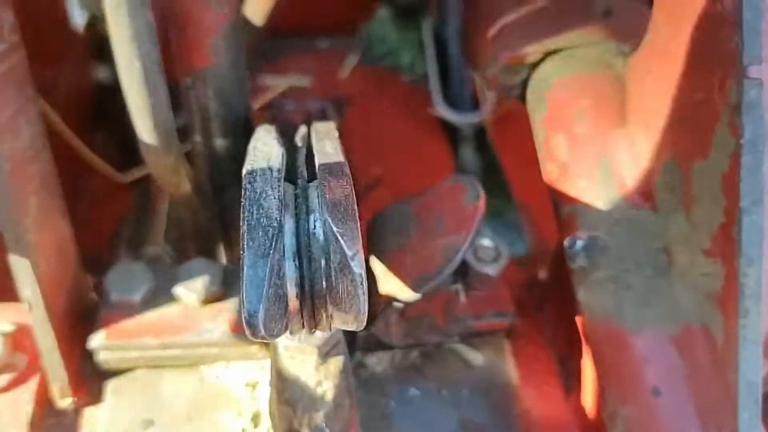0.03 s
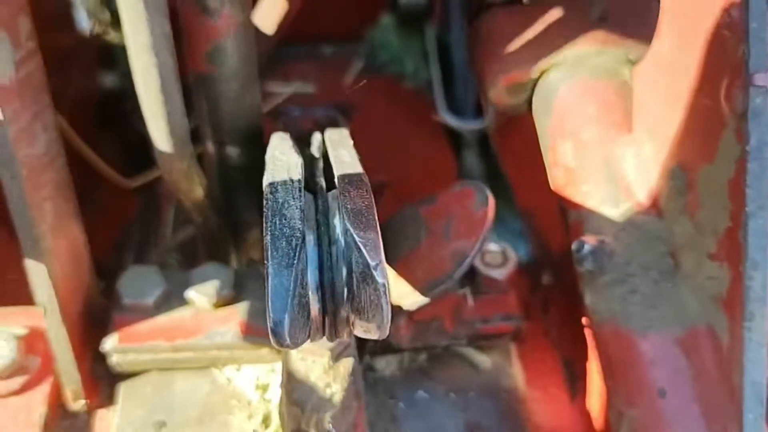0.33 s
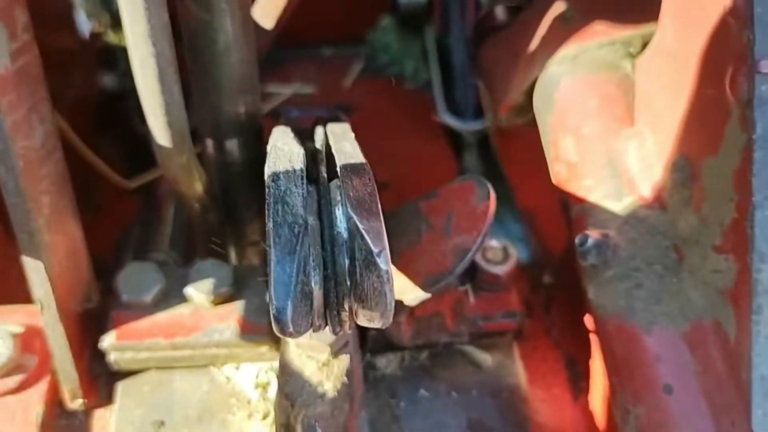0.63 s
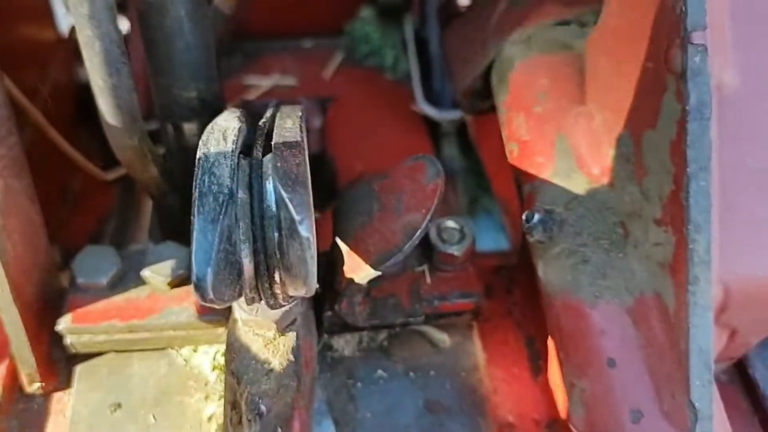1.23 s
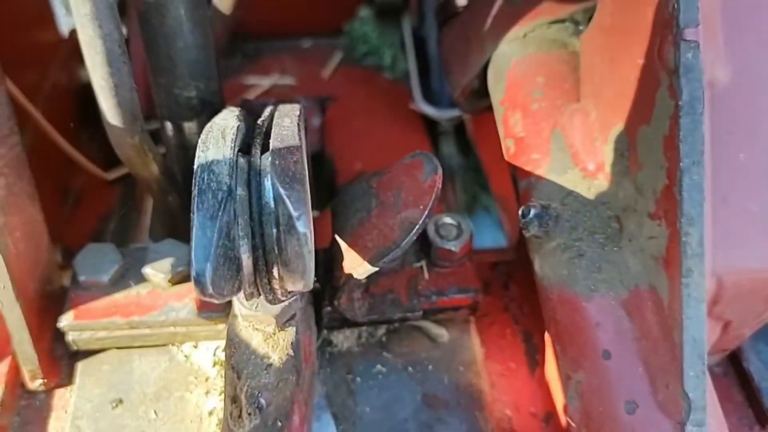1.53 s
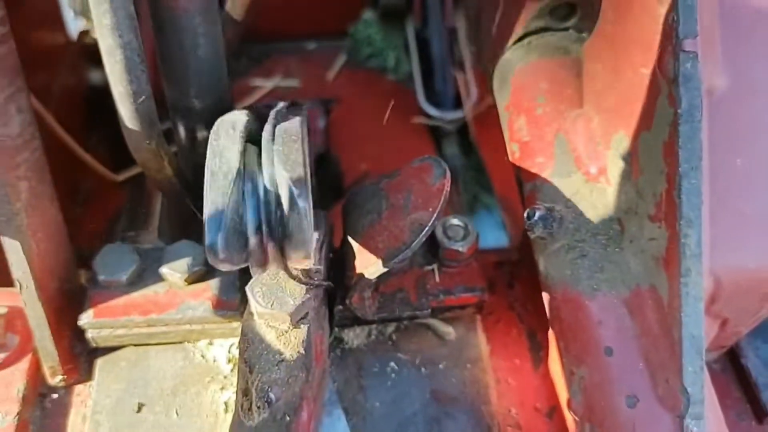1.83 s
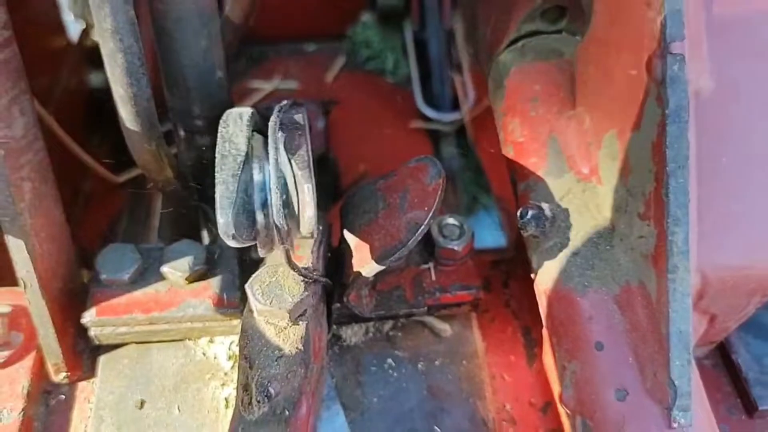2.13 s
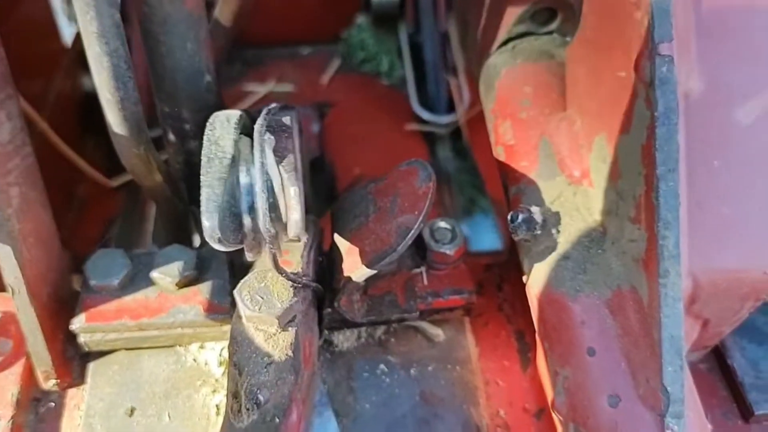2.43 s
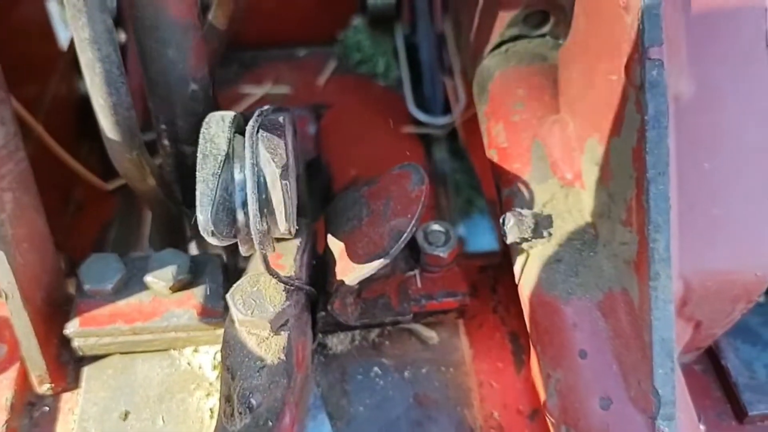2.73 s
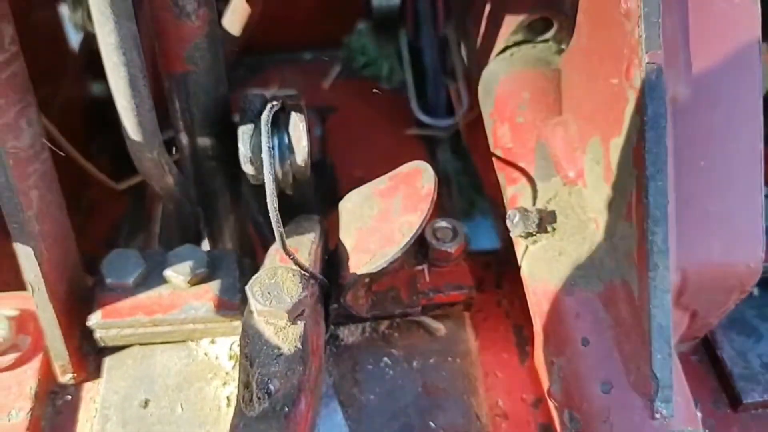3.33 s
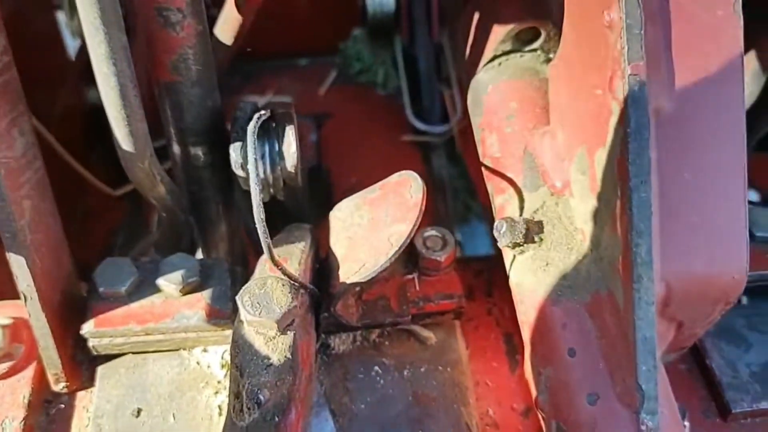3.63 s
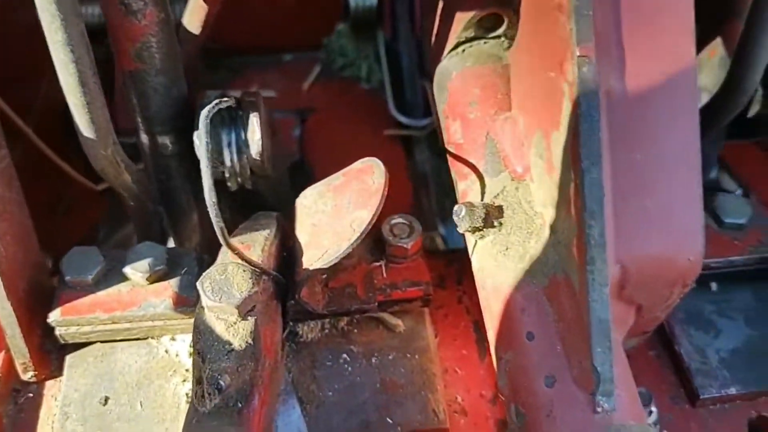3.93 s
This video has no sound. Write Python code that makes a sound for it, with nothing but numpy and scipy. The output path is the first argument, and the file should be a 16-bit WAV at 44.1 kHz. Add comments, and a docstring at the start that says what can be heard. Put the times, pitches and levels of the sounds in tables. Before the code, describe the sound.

Close up outdoors, a baler's metal mechanism gives scattered ringing clacks over faint rubbing, lets go with a double snap, then squeals briefly before one last clack, while light wind buffets the microphone.

```python
"""Outdoors on a farm, close to a baler whose wire tier is turned slowly. Steel parts click and clack,
and each impact excites the modes of the frame; the twister hook lets go with a double snap.
Friction makes the drawn wire squeal and sliding steel scrape and rub, among brief high chirps.
Beneath it, the turbulence of a light breeze buffets the microphone with rumble, pops and low hoots."""
import sys
import numpy as np
from scipy import signal
from scipy.fft import rfft, irfft, next_fast_len
from scipy.io import wavfile
from scipy.ndimage import map_coordinates

SR = 44100
rng = np.random.default_rng(int(sys.argv[2]) if len(sys.argv) > 2 else 0)


def generate_wav(signal):
    """Clip the signal to [-1, 1] and save it as 16-bit WAV at the path in sys.argv[1]."""
    frames = np.transpose(np.atleast_2d(signal))
    scaled = np.clip(frames, -1, 1) * 32767
    pcm = np.round(scaled).astype(np.int16)
    wavfile.write(sys.argv[1], SR, pcm)


N = 176400

# centres of the body, clack, click and fizz bands: frequency_hz
BANDS_HZ = [700, 2200, 4300, 13000]
# damping of a blow: frequency_hz, t60_s
BLOW_DECAY = [(400, 0.073), (2000, 0.11), (6000, 0.032), (14000, 0.053)]
# steel contacts, in relative levels: start_s, body_db, clack_db, click_db, fizz_db, ring_db
IMPACTS = [(.361, -36, -49.5, -52.5, -67.5, -0.5), (.431, -35, -42.5, -55.5, -71, -7.5),
           (.476, -49, -51, -54, -69, -7), (.689, -53, -59, -58.5, -57, -19.5),
           (1.829, -38, -45.5, -48.5, -52.5, -7.5), (1.845, -36, -36.5, -32.5, -46, 0),
           (1.876, -41, -55.5, -55, -51, 4.5), (1.935, -54.5, -54, -33.5, -46, 4.5),
           (1.952, -37.5, -39.5, -31, -35.5, -2.5), (2.162, -45, -53.5, -50, -53, -9.5),
           (2.753, -33.5, -49, -52, -63.5, -5.5), (3.061, -48.5, -52.5, -54, -50, -27),
           (3.685, -36, -42.5, -50.5, -60, -14.5)]
def impacts():
    """Impact excitation: a crack, a damped blow and the chatter of loose parts set the frame ringing."""
    out, size = np.zeros(N), SR // 4
    t = np.arange(size) / SR
    rise_s, crack_t60_s, chatter_t60_s = 0.00085, 0.013, 0.12
    attack = 1 - np.exp(-t / rise_s)
    for s, *band_db, ring_db in IMPACTS:
        blow = unit(dying(BLOW_DECAY, size))
        chatter = rng.standard_normal(size) * amp(5 * wobble(600, size) - 60 * t / chatter_t60_s)
        crack = rng.standard_normal(size) * amp(-60 * t / crack_t60_s)
        force = amp(-4.5) * unit(crack) + blow + amp(ring_db / 2 - 0.5) * unit(chatter)
        burst = amp(-18) * attack * filtered(force, lambda hz: steel_response(band_db, hz))
        add(out, s, burst)
        add(out, s, amp(ring_db) * signal.fftconvolve(burst, frame_ring()))
    return out


# resonances of the struck parts: centre_hz, width_hz, gain_db
STEEL_PEAKS = [(694.3, 38.6, 4), (2082, 320, 0), (2760, 420, 0)]
def steel_response(band_db, hz):
    """Resonant filtering: struck steel shapes a contact's spectrum with damped peaks and little bass."""
    spectrum = amp(along(list(zip(BANDS_HZ, band_db)), hz) - 2.5)
    bass_cut = (1j * hz / (204 + 1j * hz)) ** 2
    pink_tilt = np.sqrt(SR / (hz + 20))
    return spectrum * resonances(STEEL_PEAKS, hz) * bass_cut * pink_tilt


# damping of the sheet metal: frequency_hz, t60_s
SHEET_DECAY = [(300, 0.95), (1000, 0.83), (4000, 0.37), (14000, 0.044)]
# spectrum of the sheet metal: frequency_hz, gain_db
SHEET_SPECTRUM = [(700, -3), (1100, -3.5), (2500, -11.5), (4300, -6), (6500, -10.5)]
# clear modes of the frame: pitch_hz, weight_db, t60_s
FRAME_MODES = [(490, -8.5, .4), (641, -1, 0.59), (727, 4.5, 0.27), (1067, -6.5, 1), (3770, -9.5, 1)]
def frame_ring():
    """Modal superposition: the frame's impulse response is a dense wash plus a few clear modes."""
    t = np.arange(SR) / SR
    wash = dying(SHEET_DECAY, SR)
    wash = filtered(wash / np.linalg.norm(wash), lambda hz: amp(along(SHEET_SPECTRUM, hz)))
    modes = sum(np.sqrt(hz) * damped_mode(hz, db, t60, t) for hz, db, t60 in FRAME_MODES)
    return wash + amp(-17.5) * modes / np.linalg.norm(modes)


# taps on the latch and on the pawl: start_s, level_db
LATCH_TAPS = [(.057, -47.5), (1.205, -47), (1.223, -49.5), (1.273, -55.5), (1.741, -47)]
PAWL_TAPS = [(2.405, -45)]
# modes of each part: pitch_hz, gain_db, t60_s
LATCH_MODES = [(1561, -2, .1), (2100, 2.5, 0.033), (2270, -4, 0.069), (4260, -14.5, 0.038)]
PAWL_MODES = [(1244, 3.5, 0.16), (3720, -5, .14)]
def clinks(taps, modes):
    """Free vibration: a small tapped part gives a dull click and rings briefly in its own modes."""
    out, t = np.zeros(N), np.arange(SR // 3) / SR
    rise_s, click_t60_s, cutoff_hz = 0.00049, 0.1, 2880
    attack = 1 - np.exp(-t / rise_s)
    for s, db in taps:
        ring = sum(damped_mode(hz, gain + 3.5 * rng.normal(), t60, t) for hz, gain, t60 in modes)
        click = rng.standard_normal(len(t)) * amp(2 - 60 * t / click_t60_s)
        click = filtered(click, lambda hz: (1 + 1j * hz / cutoff_hz) ** -2)
        add(out, s, amp(db) * attack * (ring + click))
    return out


# second to fourth harmonics of the wire: gain_db
WIRE_OVERTONES = [-1, -7, -16]
# damping of the wire: frequency_hz, t60_s
WIRE_DECAY = [(4000, 0.2)]
# course of the squeal: time_s, pitch_hz, level_db, overtones_db
SQUEAL = [(3.045, 4020, -66, -12), (3.06, 3964, -54.5, -9), (3.098, 4010, -50, -10.5),
          (3.13, 4026, -50, -15), (3.19, 4034, -48, -8), (3.21, 3880, -46.5, 1.5),
          (3.226, 3932, -41, -11.5), (3.272, 3907, -44, -22), (3.3, 3903, -57.5, -22),
          (3.37, 3874, -72, -13)]
def wire_squeal():
    """Self-excited oscillation: the wire sings in the hook, rasps, then falls as it bites harder."""
    hz, db, bright_db = curves(SQUEAL)
    t = np.arange(N) / SR
    jitter, flutter_db, rasp_centre_s, rasp_sigma_s = .008, 2.5, 3.155, 0.025
    phase = 2 * np.pi * np.cumsum(hz * (1 + jitter * wobble(1500))) / SR
    overtones = sum(amp(bright_db + gain + flutter_db * wobble(90)) * np.sin(k * phase)
                    for k, gain in enumerate(WIRE_OVERTONES, 2))
    # period doubling puts partials halfway between the harmonics
    halfway = sum(np.sin((k + .5) * phase) for k in range(1, 4))
    rasp = amp(-24) * swell(t - rasp_centre_s, rasp_sigma_s) * halfway
    sounding = (t > SQUEAL[0][0]) & (t < SQUEAL[-1][0])
    envelope = sounding * amp(db + flutter_db * wobble(180))
    tone = envelope * (np.sqrt(2) * (np.sin(phase) + overtones) + rasp)
    ring = dying(WIRE_DECAY, SR // 4)
    return tone + amp(-4.5) * signal.fftconvolve(tone, ring / np.linalg.norm(ring))[:N]


# brief high chirps and low wind hoots: centre_s, sigma_s, pitch_hz, level_db, jitter_hz
CHIRPS_AND_HOOTS = [(0.63, 0.022, 2075, -55.5, 59.4), (1.946, 0.013, 14560, -36, 37),
                    (2.086, 0.014, 331, -28.5, 39), (3.222, 0.056, 5590, -79, 25.2),
                    (3.523, 0.019, 334.7, -31.5, 34.2)]
def chirps_and_hoots():
    """Frequency jitter roughens brief high chirps and the low hoots of wind buffeting the microphone."""
    out, size = np.zeros(N), SR // 5
    t = (np.arange(size) - size / 2) / SR
    harmonic_step_db = -27.5
    for s, sigma_s, pitch_hz, db, jitter_hz in CHIRPS_AND_HOOTS:
        hz = pitch_hz + jitter_hz * wobble(396.7, size)
        phase = 2 * np.pi * np.cumsum(hz) / SR
        tone = sum(amp(harmonic_step_db * (k - 1)) * np.sin(k * phase) * (k * hz < SR / 2)
                   for k in range(1, 5))
        add(out, s + t[0], amp(db) * swell(t, sigma_s) * np.sqrt(2) * tone)
    return out


# dragging parts, in relative levels: centre_s, sigma_s, body_db, clack_db
SCRAPES = [(.445, 0.043, -34, -52), (3.334, 0.0051, -66, -56.5), (3.503, 0.013, -68, -50.5)]
def scrapes():
    """Forced vibration: a part judders over its neighbour, driving the steel with a swell of grains."""
    out, t = np.zeros(N), np.arange(N) / SR
    cutoff_hz = 3870
    for s, sigma_s, *band_db in SCRAPES:
        grains = rng.standard_normal(N) * amp(3.5 * wobble(200) - 3) * swell(t - s, sigma_s)
        out += filtered(grains, lambda hz: steel_response(band_db, hz) / (1 + (hz / cutoff_hz) ** 2) ** 2)
    return out


# strength of the sliding: time_s, relative_level_db
RUB_LEVELS = [(0, -56), (.32, -74), (.62, -59.5), (.88, -67), (1.1, -70), (1.7, -74), (2.07, -56.5),
              (2.25, -61), (2.72, -65.5), (2.92, -62), (3.6, -62.5), (3.85, -69)]
# spectrum of the friction: frequency_hz, gain_db
RUB_SPECTRUM = [(150, -10.5), (600, 1.5), (2600, -11.5), (4500, -19.5), (5800, -30.5), (15000, -33.5)]
# resonances of the sliding parts: centre_hz, width_hz, gain_db
RUB_PEAKS = [(2087, 35, 2.5), (2504, 54, 5), (4110, 110, -1.5)]
def rubbing():
    """Broadband excitation: friction and ticks of trapped grit drive the sliding parts' resonances."""
    db, = curves(RUB_LEVELS)
    ticks_per_s = 70
    friction = rng.standard_normal(N) * amp(1.75 * wobble(120))
    ticks = (rng.random(N) < ticks_per_s / SR) * amp(4.5 * rng.standard_normal(N))
    force = unit(friction) + amp(-6) * unit(ticks)
    sliding = filtered(force, lambda hz: amp(along(RUB_SPECTRUM, hz)) * resonances(RUB_PEAKS, hz))
    return amp(db + 1.5) * unit(sliding)


# spectra of the rumble and the buffeting: frequency_hz, gain_db
RUMBLE_SPECTRUM = [(20, -57.5), (62, -7), (98, 2.5), (200, -19), (400, -86.5)]
BUFFET_SPECTRUM = [(70, -26), (150, 0.5), (330, -11), (520, -29.5), (4000, -74.5)]
# single eddies: centre_s, level_db
EDDY_POPS = [(.28, -30), (1.304, -32), (1.447, -30), (2.234, -25.5), (2.263, -24.5), (2.285, -23),
             (3.155, -30.5)]
# strength of the breeze, in relative levels: time_s, rumble_db, buffet_db
BREEZE = [(0, -39.5, -46.5), (.8, -42, -44), (1, -45.5, -53), (1.38, -38, -43.5), (2.08, -44.5, -34.5),
          (2.9, -38.5, -39.5), (3.9, -43.5, -46.5)]
def breeze():
    """Turbulent pressure: moving air rumbles and buffets the microphone, and single eddies pop."""
    rumble_db, buffet_db = curves(BREEZE)
    air = amp(rumble_db - 1.5 + 3.5 * wobble(26.04)) * noise(RUMBLE_SPECTRUM)
    air += amp(buffet_db - 1 + 3.5 * wobble(35)) * noise(BUFFET_SPECTRUM)
    t = np.arange(-SR // 20, SR // 20) / SR
    pop_width_s = 0.00071
    passage = t / pop_width_s
    pulse = 2 * passage / (1 + passage ** 2) ** 1.5
    stray_pops = [(i / SR, buffet_db[i] + 6.5 + 7.5 * rng.normal()) for i in rng.integers(N, size=12)]
    for s, db in [*EDDY_POPS, *stray_pops]:
        add(air, s + t[0], amp(db) * pulse)
    return air


def amp(db):
    """Decibels as an amplitude ratio."""
    return 10 ** (np.asarray(db) / 20)


def unit(x):
    """Normalisation to rms 1."""
    return x / np.sqrt(np.mean(x ** 2) + 1e-20)


def along(points, hz):
    """Interpolation of (frequency_hz, value) points on a log axis."""
    f, v = np.transpose(points)
    return np.interp(np.log(hz + 1), np.log(f + 1), v)


def curves(rows):
    """Linear interpolation: one value per sample for each column after the time."""
    s, *cols = np.transpose(rows)
    return [np.interp(np.arange(N) / SR, s, c) for c in cols]


def wobble(rate_hz, size=N):
    """Random modulation: a smooth curve with rate_hz knots a second."""
    knots = rng.standard_normal(int(size * rate_hz / SR) + 4)
    return map_coordinates(knots, [np.arange(size) * rate_hz / SR])


def swell(t, sigma_s):
    """A Gaussian envelope centred on t = 0."""
    return np.exp(-.5 * (t / sigma_s) ** 2)


def damped_mode(hz, db, t60, t):
    """Exponential decay of a sinusoid with random phase."""
    return amp(db - 60 * t / t60) * np.sin(2 * np.pi * (hz * t + rng.random()))


def resonances(peaks, hz):
    """Second-order resonators in parallel with a flat response."""
    return 1 + sum(amp(db) * 1j * hz * width / (f * f - hz * hz + 1j * hz * width)
                   for f, width, db in peaks)


def filtered(x, gain):
    """Linear filtering: the spectrum of x times gain(hz)."""
    size = next_fast_len(len(x) + SR // 10)
    return irfft(rfft(x, size) * gain(np.fft.rfftfreq(size, 1 / SR)), size)[:len(x)]


def noise(spectrum):
    """Coloured noise of rms 1."""
    return unit(filtered(rng.standard_normal(N), lambda hz: amp(along(spectrum, hz))))


def dying(decay, size):
    """Frequency-dependent damping: noise in which each band dies at its own rate."""
    hz, t, bands = signal.stft(rng.standard_normal(size), SR, nperseg=128)
    bands *= amp(-60 * t / along(decay, hz)[:, None])
    return signal.istft(bands, SR, nperseg=128)[1][:size]


def add(track, s, sound):
    """Mix a sound in at time s."""
    part = track[max(round(s * SR), 0):][:len(sound)]
    part += sound[:len(part)]


def scene():
    """Superposition: impacts, friction and wind sum in one channel."""
    contacts = impacts() + clinks(LATCH_TAPS, LATCH_MODES) + clinks(PAWL_TAPS, PAWL_MODES)
    return (contacts + scrapes() + wire_squeal() + chirps_and_hoots() + rubbing() + breeze())[None]


def record(dry):
    """Band limiting: a steep low-pass removes the highest treble."""
    cutoff_hz, edge_hz = 15950, 80
    return np.array([filtered(x, lambda hz: .5 - .5 * np.tanh((hz - cutoff_hz) / edge_hz)) for x in dry])


dry = scene()
out = record(dry)
generate_wav(out)
```